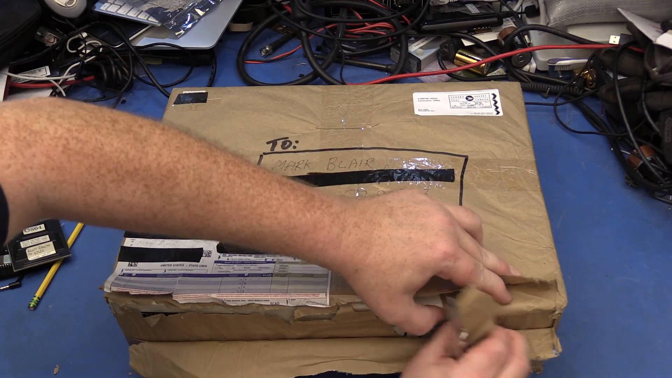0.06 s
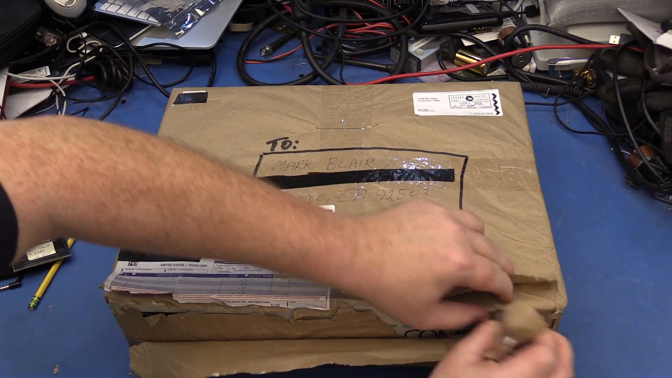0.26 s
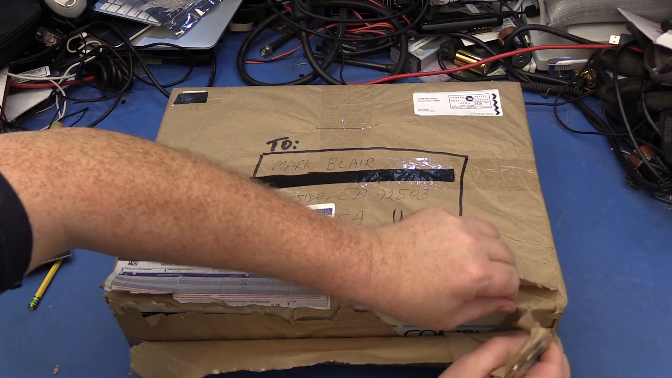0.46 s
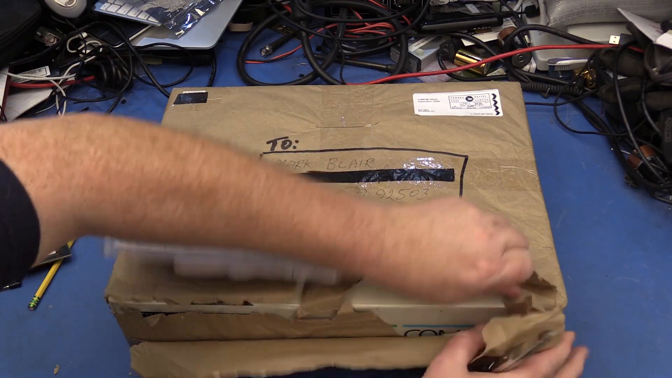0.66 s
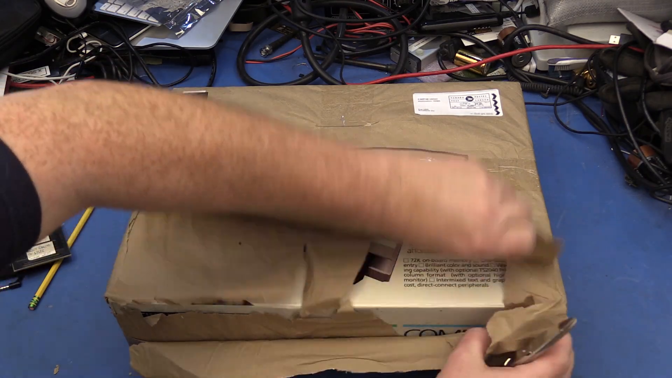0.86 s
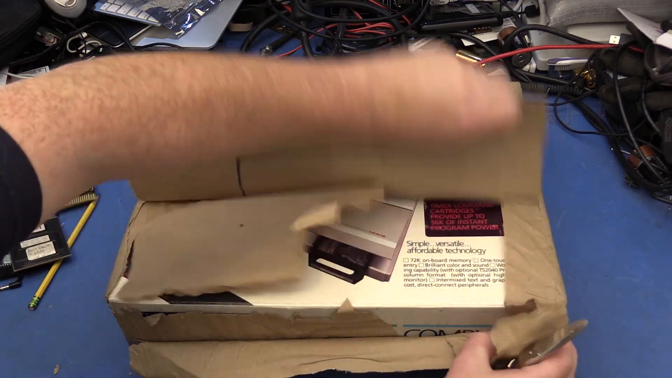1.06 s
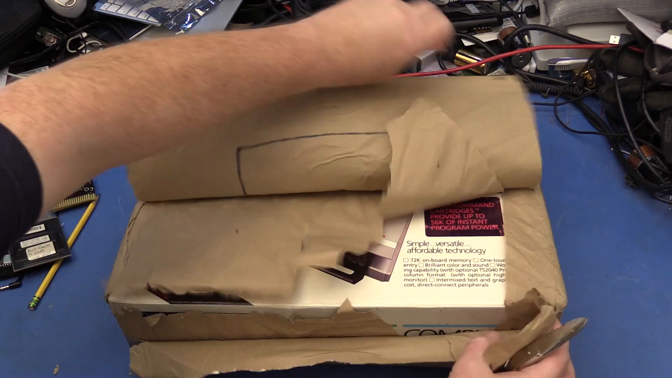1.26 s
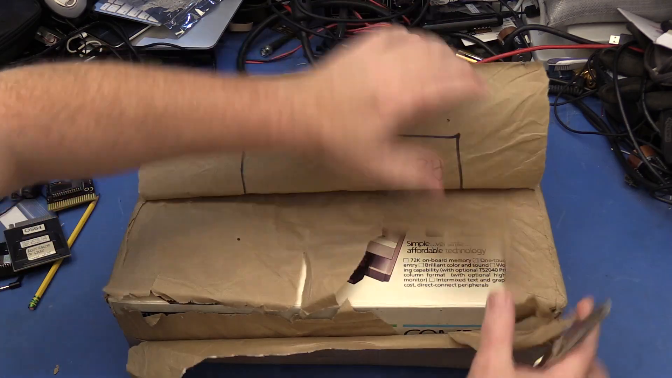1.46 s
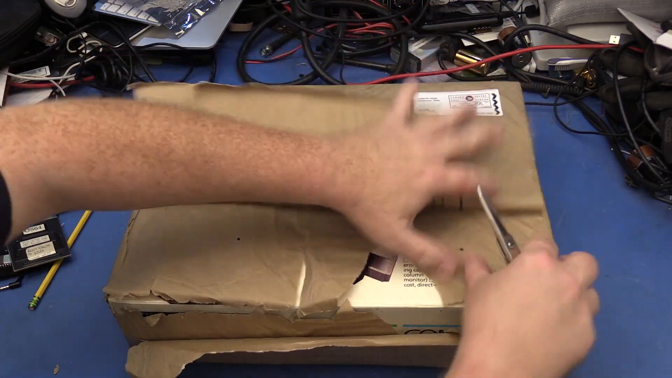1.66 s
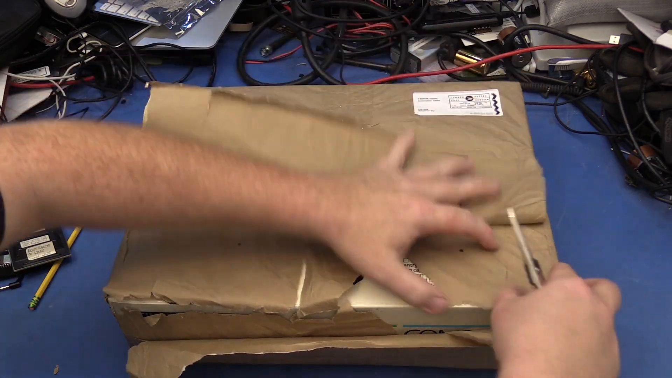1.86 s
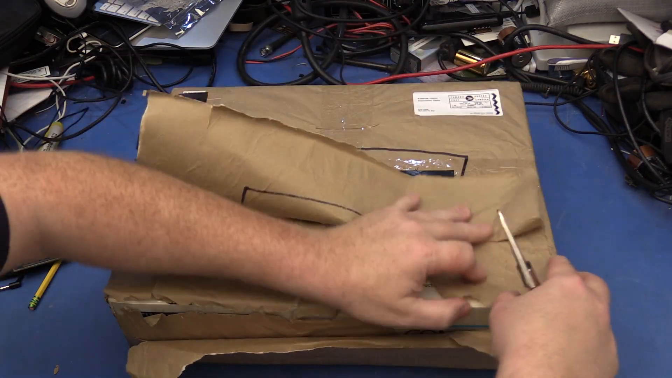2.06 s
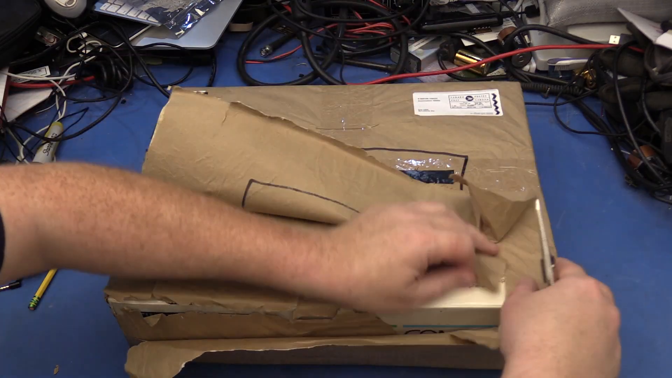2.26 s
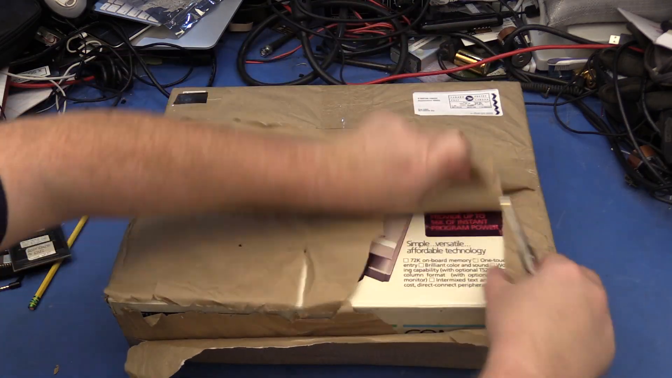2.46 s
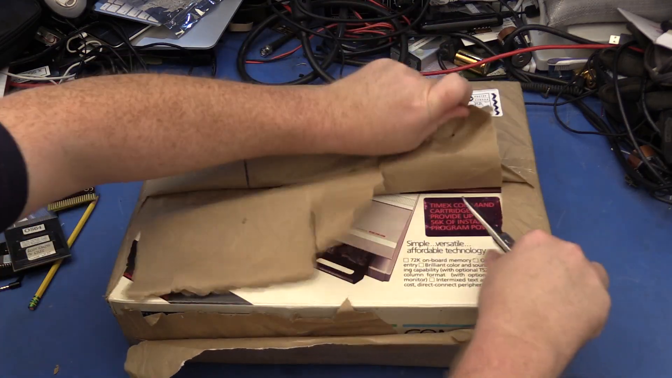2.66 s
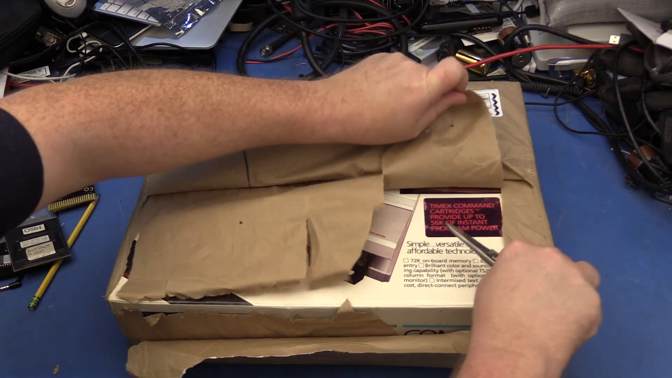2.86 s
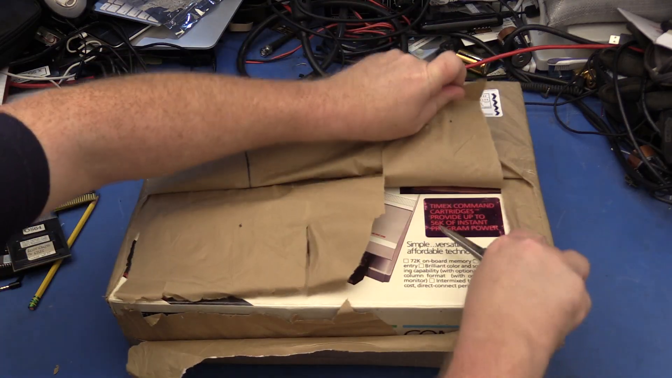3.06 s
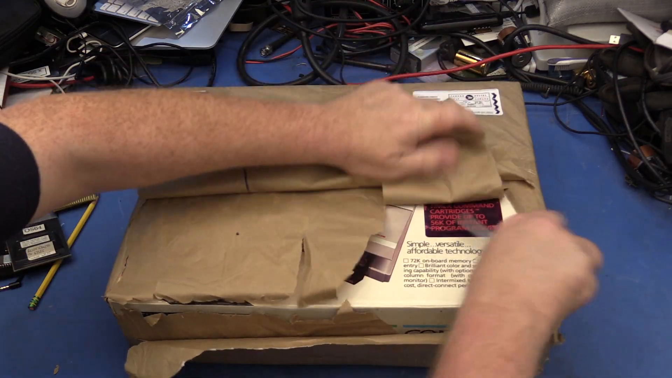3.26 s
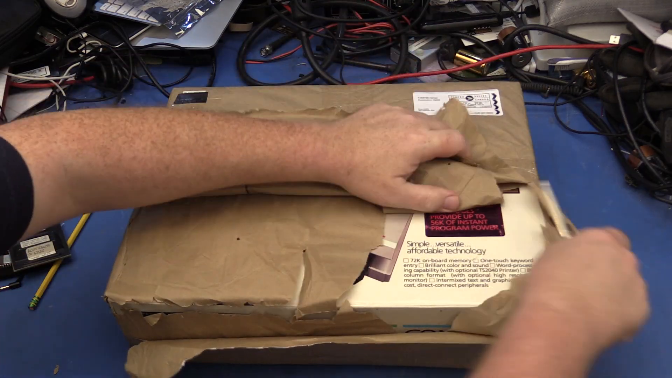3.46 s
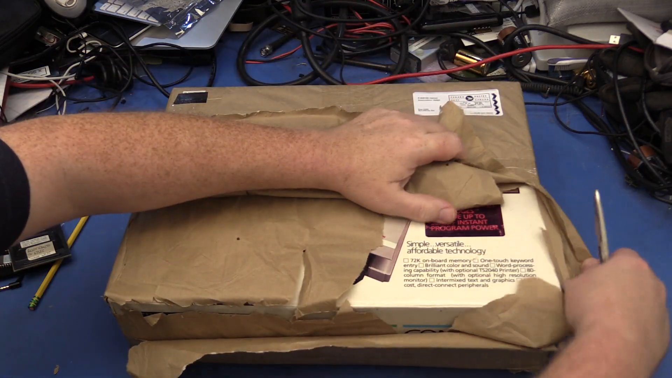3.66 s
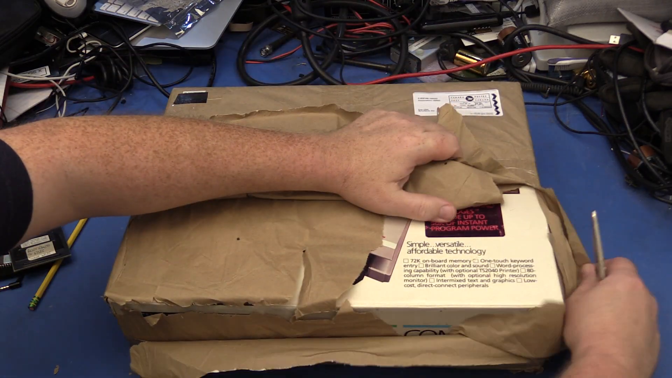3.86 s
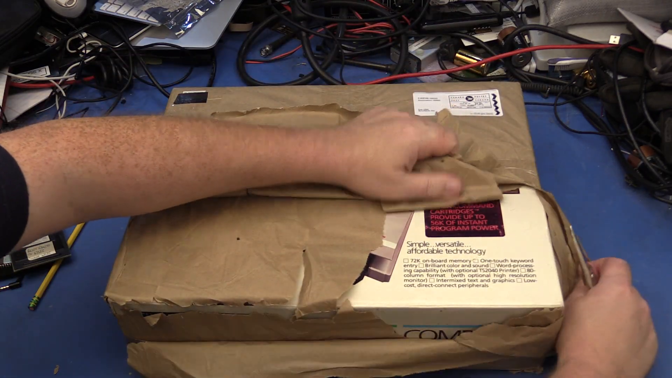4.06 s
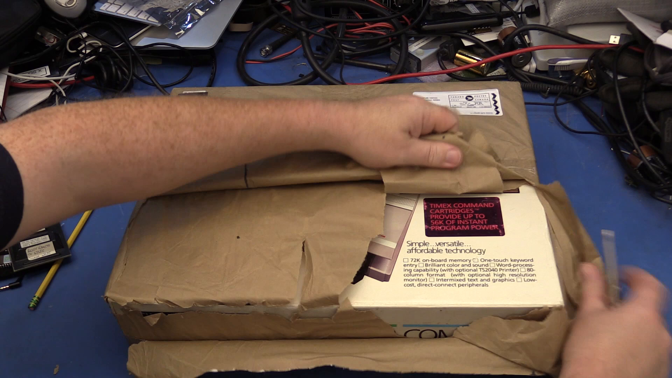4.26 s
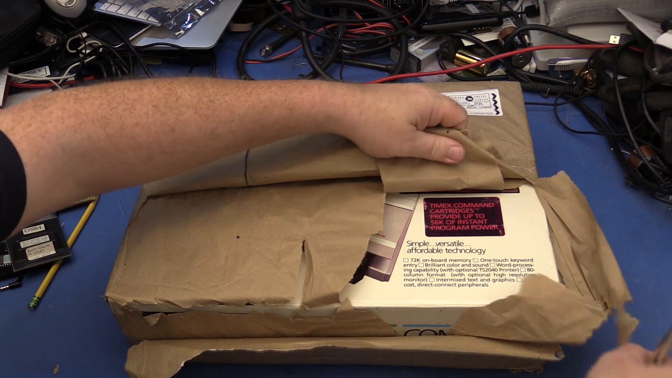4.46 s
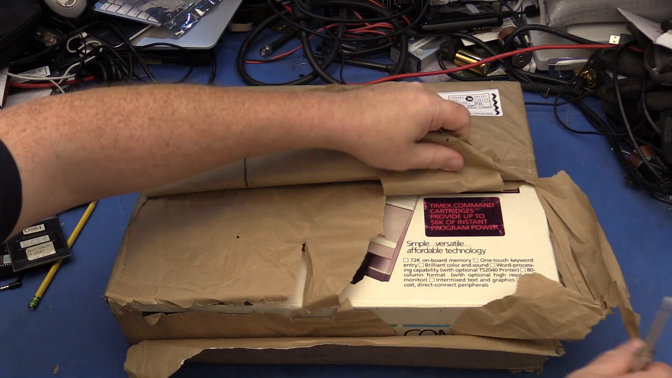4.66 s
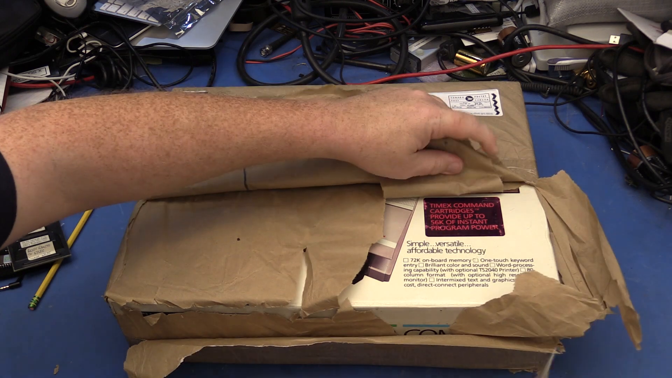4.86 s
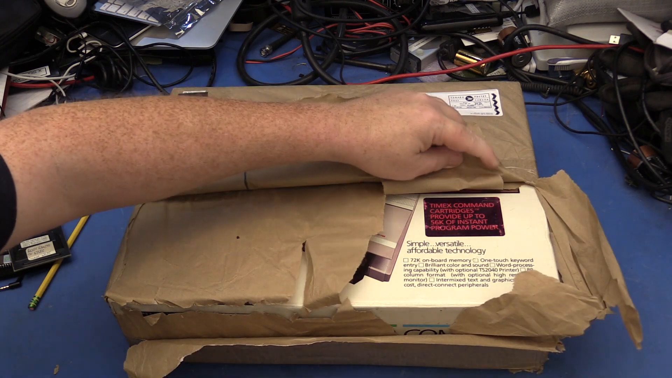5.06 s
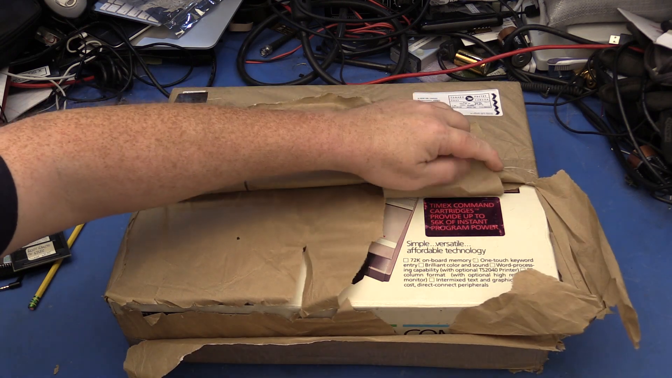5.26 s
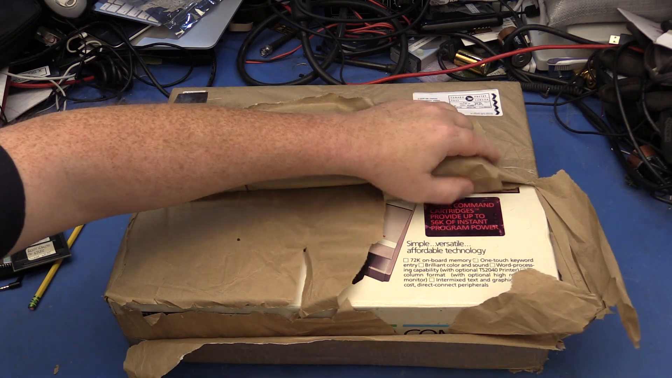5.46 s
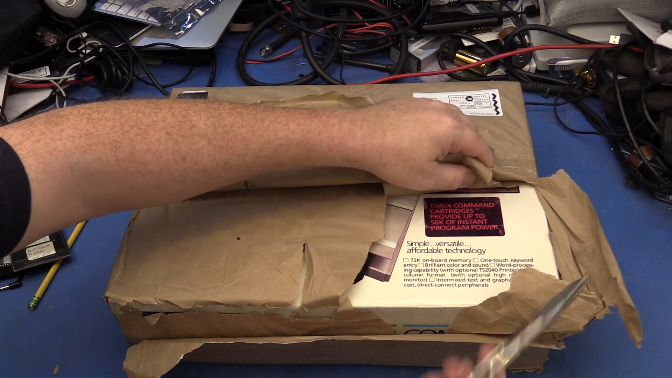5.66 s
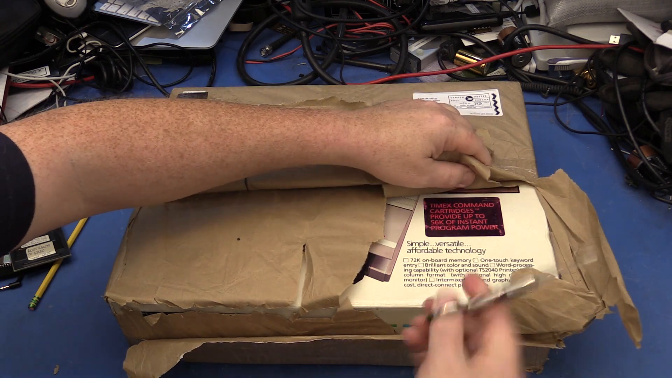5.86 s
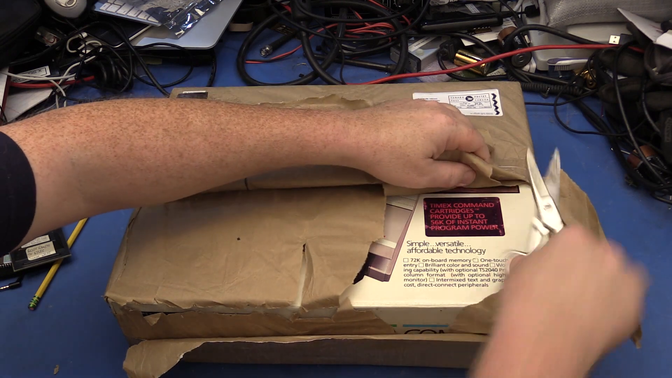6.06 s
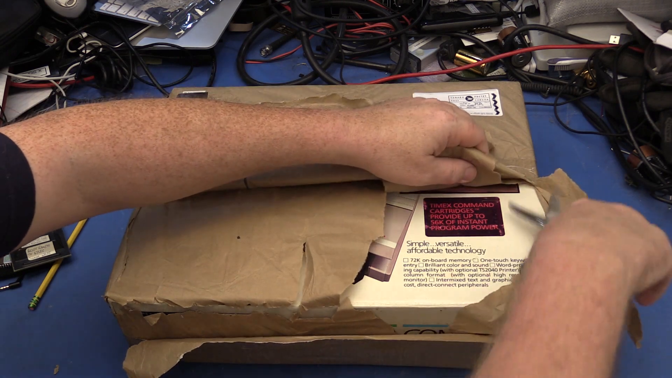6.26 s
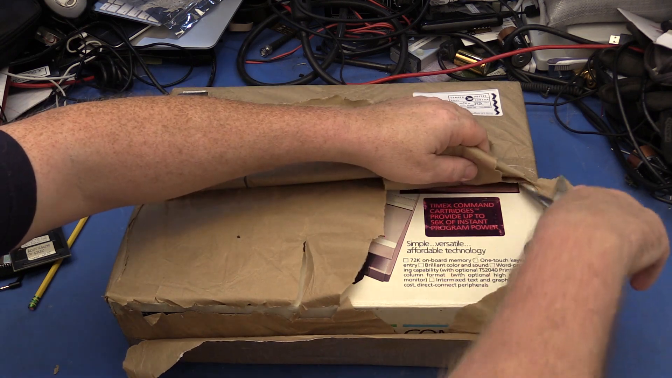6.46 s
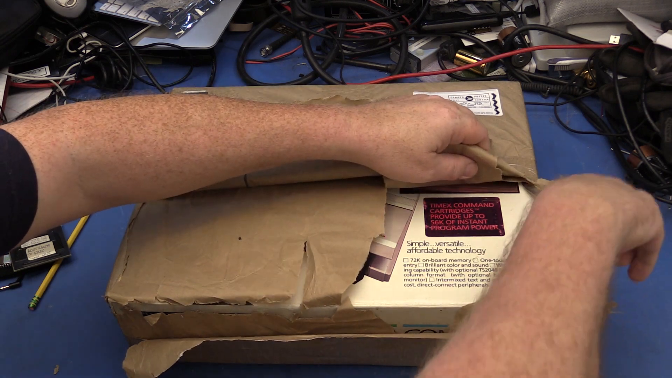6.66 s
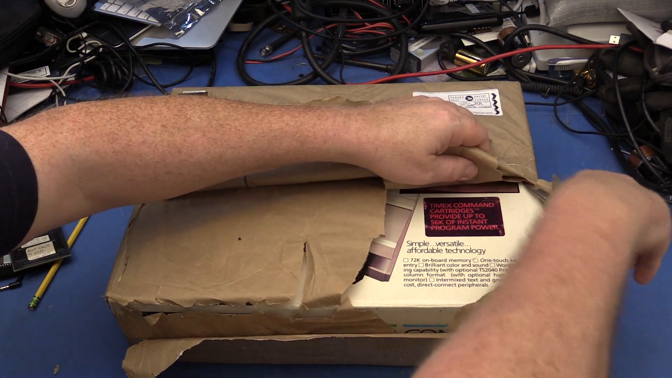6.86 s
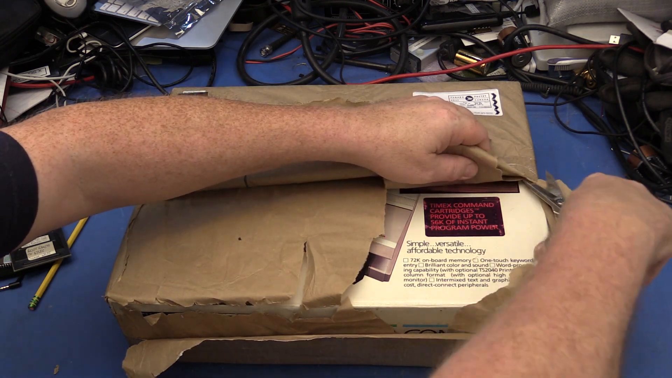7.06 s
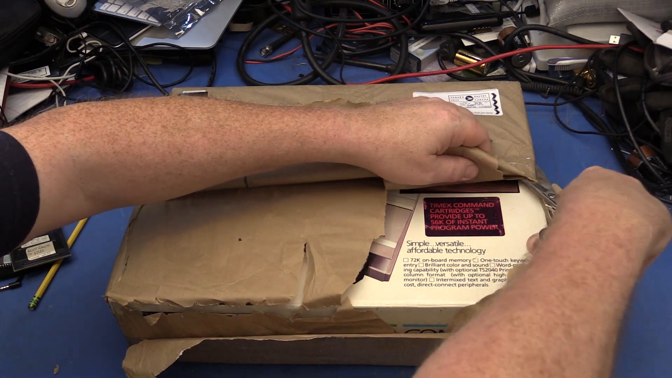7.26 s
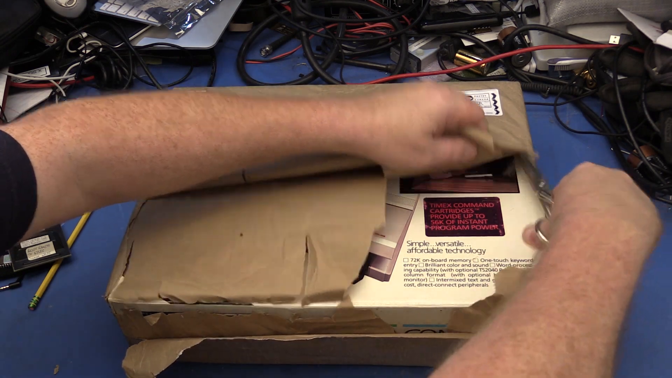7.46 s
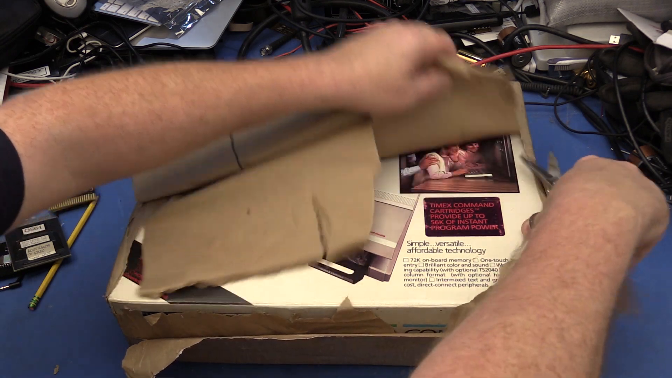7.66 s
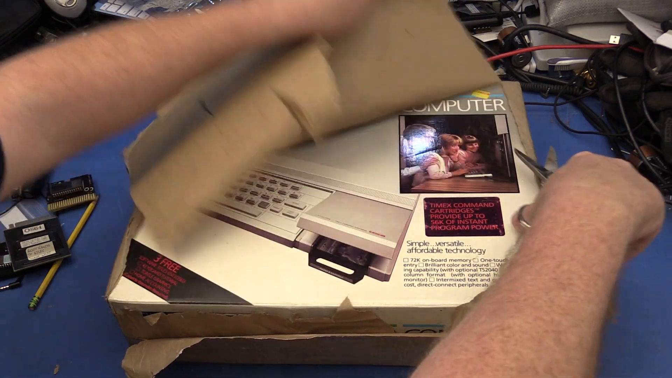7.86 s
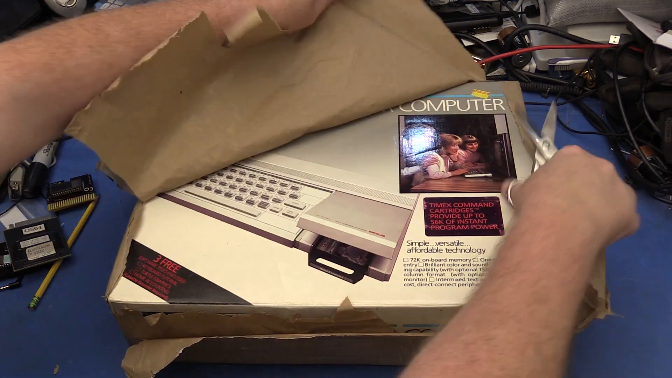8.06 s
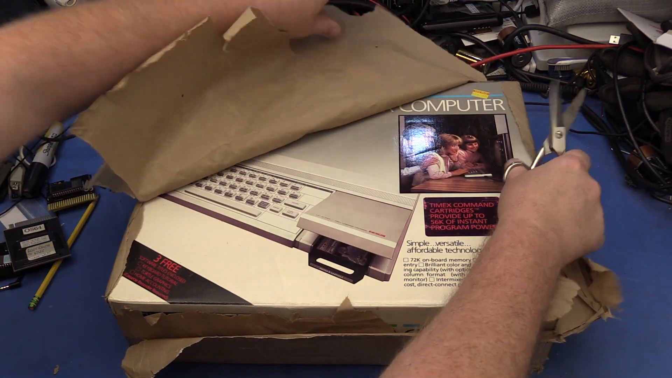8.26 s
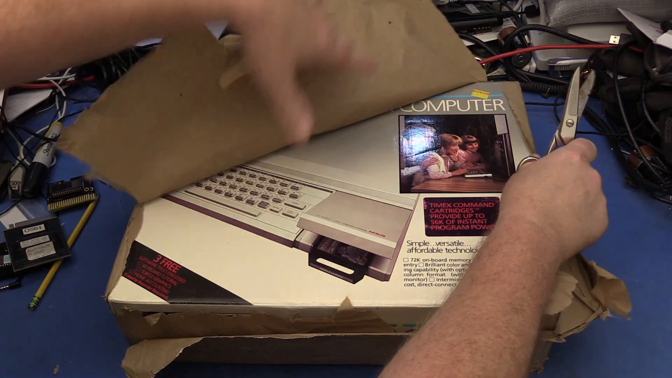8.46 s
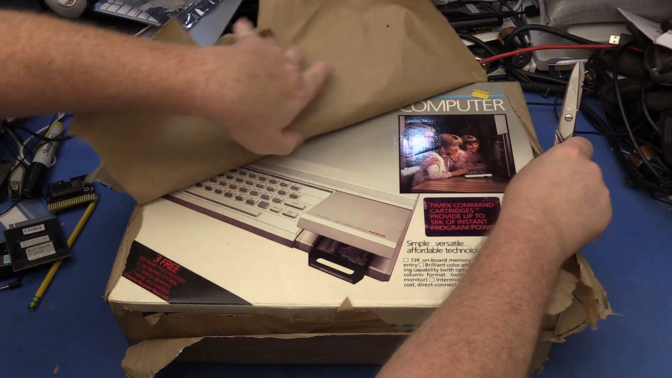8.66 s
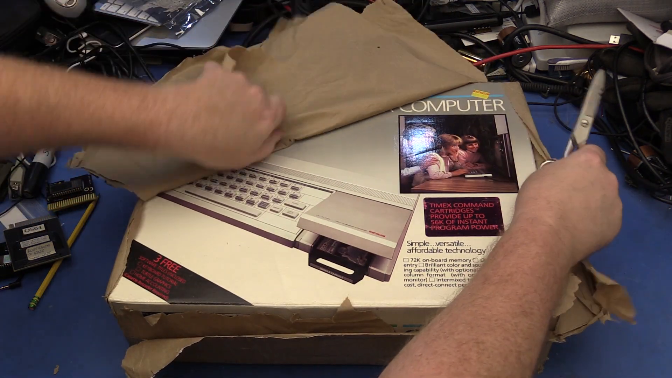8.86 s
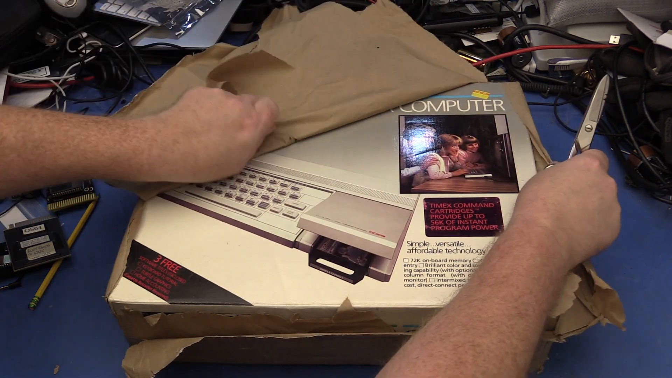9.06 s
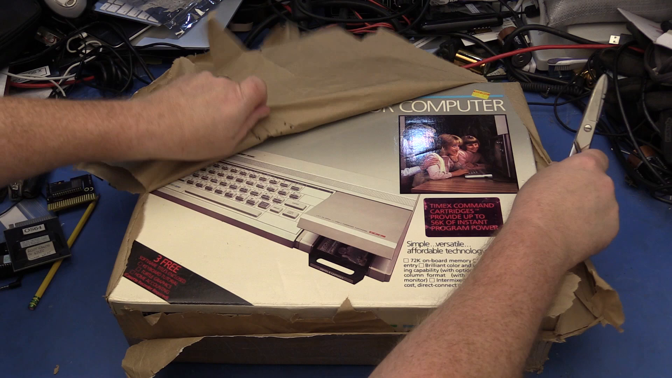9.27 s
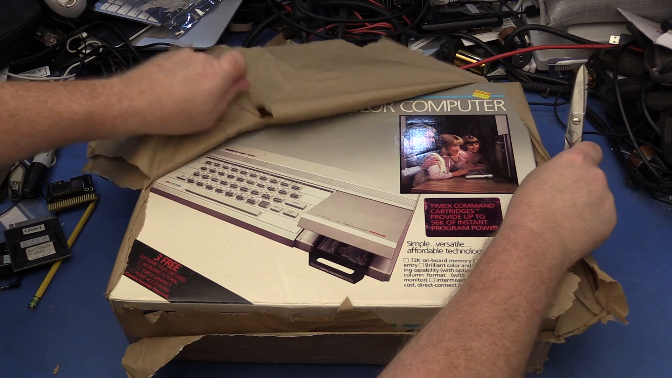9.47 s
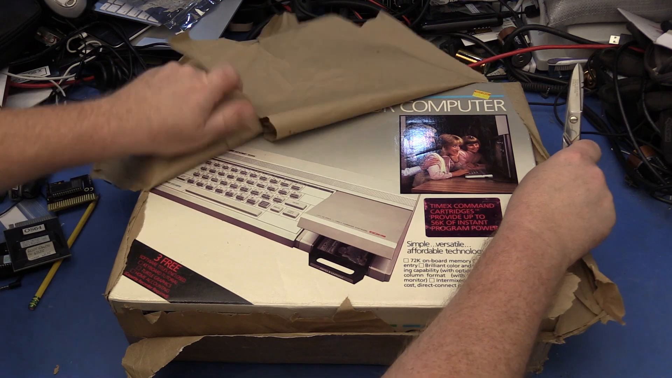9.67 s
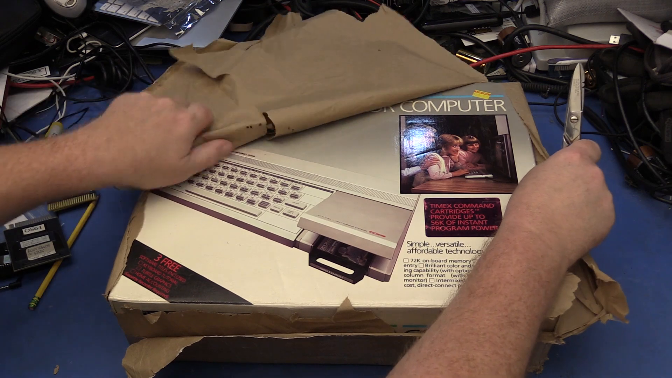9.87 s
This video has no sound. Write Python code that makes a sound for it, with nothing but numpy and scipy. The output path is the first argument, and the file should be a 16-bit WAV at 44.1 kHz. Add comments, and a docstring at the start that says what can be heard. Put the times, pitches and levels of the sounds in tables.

```python
"""Stiff brown paper snaps, crackles and hisses close by as two hands pull, crease, tear and cut it off a box.
Creases buckle as noise bursts with a ringing panel, over clumps of small crackles made of enveloped noise.
The sheet over the box answers low and the fibres high, each as noise through its own spectrum.
Low gusts from the moving sheet push at the microphone and dull bumps shake the cardboard box.
A small room adds decaying noise tails; a quiet, slowly wavering floor of noise lies behind."""
import sys
import numpy as np
from scipy import signal
from scipy.fft import rfft, irfft, next_fast_len
from scipy.io import wavfile
from scipy.ndimage import uniform_filter1d, map_coordinates

SR = 44100
rng = np.random.default_rng(int(sys.argv[2]) if len(sys.argv) > 2 else 0)


def master_out(mix):
    """Clip the mix to full scale and print it as 16-bit PCM to the path in sys.argv[1]."""
    frames = np.transpose(np.atleast_2d(mix))
    ceiling = np.clip(frames, -1, 1)
    pcm = np.round(ceiling * 32767).astype(np.int16)
    wavfile.write(sys.argv[1], SR, pcm)


N = 437472


def amp(db):
    """Decibel law: a level in dB becomes an amplitude ratio."""
    return 10 ** (np.asarray(db) / 20)


def unit(x):
    """Power normalisation: x scaled to rms 1."""
    return x / np.sqrt(np.mean(x ** 2) + 1e-20)


def along(points, hz):
    """Logarithmic frequency scale: (Hz, value) points joined by straight lines over log frequency."""
    point_hz, values = np.transpose(points)
    return np.interp(np.log(hz + 1), np.log(point_hz + 1), values)


def curves(rows):
    """Slow modulation: one value per sample for each column after the time."""
    s, *columns = np.transpose(rows)
    return [np.interp(np.arange(N) / SR, s, column) for column in columns]


def wobble(rate):
    """Band-limited random modulation: a smooth curve through `rate` random knots a second."""
    knots = rng.standard_normal(int(N * rate / SR) + 4)
    return map_coordinates(knots, [np.arange(N) * rate / SR])


def colour(x, spectrum):
    """Minimum-phase filtering: x takes on this spectrum causally, with power gain 1."""
    m = next_fast_len(N + SR // 4)
    gain = amp(along(spectrum, np.fft.rfftfreq(m, 1 / SR))) + 1e-4
    cepstrum = irfft(np.log(unit(gain)), m)
    # folding the cepstrum onto positive time makes the filter causal
    cepstrum[1:m // 2] *= 2
    cepstrum[m // 2 + 1:] = 0
    return irfft(rfft(x, m) * np.exp(rfft(cepstrum)), m)[:N]


def patchy(depth_db):
    """Random spectral modulation: noise whose colour differs from one small fold to the next."""
    noise = signal.stft(rng.standard_normal(N), nperseg=128)[2]
    field = uniform_filter1d(rng.standard_normal(noise.shape), size=5, axis=0)
    field = uniform_filter1d(field, size=4, axis=1)
    return unit(signal.istft(noise * amp(depth_db * unit(field)), nperseg=128)[1][:N])


# How hard the hands work the sheet. Each row: time in seconds, crackle level in dB.
EFFORT = [(0, -45.5), (.17, -35), (.24, -31.5), (.37, -38), (.54, -50.5), (.74, -37), (.85, -40),
          (.96, -26.5), (1.18, -26.5), (1.28, -39), (1.33, -33), (1.37, -44.5), (1.61, -58), (1.74, -40),
          (1.89, -50.5), (2.0, -39.5), (2.38, -44), (2.43, -35.5), (2.6, -26), (2.64, -24), (2.71, -42),
          (2.98, -38), (3.13, -41), (3.21, -35), (3.39, -29), (3.56, -40.5), (3.89, -40.5), (4.01, -34),
          (4.31, -39), (4.48, -37.5), (4.65, -54), (4.71, -45.5), (5.02, -58.5), (5.07, -46.5), (5.22, -58),
          (5.32, -47), (5.52, -47.5), (5.62, -37.5), (5.81, -65), (6.02, -69.5), (6.22, -49), (6.4, -57),
          (6.6, -52), (6.74, -60.5), (7.1, -64.5), (7.27, -47), (7.4, -55.5), (7.43, -31.5), (7.57, -29.5),
          (7.9, -21.5), (8.02, -24), (8.09, -37.5), (8.23, -42), (8.29, -35), (8.37, -45), (8.52, -46.5),
          (8.59, -33), (8.68, -42.5), (8.75, -44.5), (8.83, -33.5), (9.09, -41), (9.22, -33.5),
          (9.4, -39.5), (9.49, -29), (9.55, -24.5), (9.67, -41.5), (9.79, -32.5), (9.86, -49.5),
          (9.92, -43.5)]
# The rustle left by a 1 ms snap, re the snap's crackle setting, and how fast it dies
SETTLE_DB, SETTLE_DB_PER_S = -24, 188


def effort_db():
    """Power addition: the pull of the hands plus the decaying rustle of the sheet settling after every snap."""
    s, db, _, _, ms = np.transpose(CREASE_SNAPS)
    kicks = np.bincount(np.round(s * SR).astype(int), amp(2 * (db + SETTLE_DB)) * ms, N)
    settling = signal.lfilter([1], [1, -amp(-2 * SETTLE_DB_PER_S / SR)], kicks)
    pull = amp(2 * curves(EFFORT)[0])
    return 10 * np.log10(pull + settling)


def crackles(busy, spread_db, own_db, life_ms, slide):
    """Shot noise: three trains of bursts share their times, `busy` a second, over the even hiss of sliding."""
    at = np.nonzero(rng.random(N) < busy / SR)[0]
    shared_db = spread_db * np.minimum(rng.exponential(size=len(at)), 3.5)
    trains = []
    for life in life_ms:
        starts = np.zeros(N)
        starts[at] = amp(2 * (shared_db + own_db * rng.standard_normal(len(at))))
        # burst amplitude falls by a factor e in one life
        power = np.abs(signal.lfilter([1], [1, -np.exp(-2000 / (life * SR))], starts))
        # the hand sets the slow level, the bursts share it out
        power /= uniform_filter1d(power, SR // 8) + 1e-9
        envelope = np.sqrt(slide + (1 - slide) * power)
        trains.append(envelope * patchy(depth_db=2.5))
    return trains


# Spectrum of the sheet over the box. Each row: frequency in Hz, relative level in dB per Hz.
BODY_SPECTRUM = [(59, -31.5), (100, -12), (253, -5), (313, -5), (462, -3.5), (816, 0.5), (1400, -1.5),
                 (2010, -3.5), (3600, -15.5), (4680, -17.5), (7920, -120)]
# Spectrum of the crackles. Each row: frequency in Hz, relative level in dB per Hz.
CRACKLE_SPECTRUM = [(1800, -18), (2800, -9), (3600, -8.5), (4700, 0), (5800, -0.5), (6900, -2.5),
                    (8200, -18.5), (10000, -23)]
# Spectrum of the fibre hiss. Each row: frequency in Hz, relative level in dB per Hz.
FIBRE_SPECTRUM = [(5000, -46), (7000, -7), (8200, -2.5), (10000, -2.5), (12000, -4.5), (13200, -7),
                  (15200, -8.5), (16500, -40)]


def paper(low, mid, high):
    """Superposition: sheet body, crackle and fibres each radiate in their own band."""
    return colour(low, BODY_SPECTRUM) + colour(mid, CRACKLE_SPECTRUM) + colour(high, FIBRE_SPECTRUM)


# Slow colour of the paper. Each row: time in seconds, sheet body re crackle in dB, fibre hiss re crackle
# in dB, then the level in dB of the regions near 2 kHz, near 3 kHz and near 9 kHz.
PAPER_COLOUR = [(0, 5, 3.5, -4, -0.5, 5), (.25, 3, 7, 0.5, 8.5, 1.5), (.55, 7, 3.5, -7.5, 4, 2),
                (.9, 10, 5, -6.5, -1.5, 1), (1.3, 7.5, -1, -5.5, 1, 1.5), (1.6, 9.5, -5, -3, 0, 3),
                (1.8, 12.5, 2.5, -6, -1, 2.5), (2.4, 2.5, 3, 0.5, 5.5, -1.5),
                (2.6, 10, 4.5, -1.5, -0.5, 0.5), (2.85, 7, 3, 1.5, 0, -0.5), (3.4, 5, 2, 0.5, 1, 3),
                (3.85, 4.5, 4.5, 0, 3, 0), (4.3, 4, -2, 2, -0.5, 1.5), (5.4, 3, -4, 4.5, 3, 3),
                (6.3, 8, -3.5, 0, -0.5, -.5), (7.35, 4, -0.5, 1, 0, 1), (7.601, 5.5, 2.5, -2, -6, -3),
                (7.95, 3.5, -0.5, -.5, -1.5, 0.5), (8.6, 4.5, -1.5, 1, -0.5, 1.5), (9.45, 5, 1, 0, 5, 2),
                (9.92, 10, 2.5, -5, 5, 0)]
BODY_SHIFT = -0.14  # dB of body gained per dB of effort: light handling is duller


def rustle():
    """Stick-slip friction: harder pulls crackle louder, denser and more evenly; light ones clump as folds yield."""
    db = effort_db()
    body_db, fibre_db, *_ = curves(PAPER_COLOUR)
    body_db = body_db + BODY_SHIFT * (db + 38)
    clumps_db = np.clip(-.15 * (db + 14.5), 0, 8) * wobble(50)
    busy = 400 * amp(.5 * (db + 34.5) + clumps_db)  # crackles a second
    slide = np.clip(0.45 + 0.0055 * (db + 39), 0, .9)  # share of power in even hiss
    low, mid, high = crackles(busy, spread_db=1.0, own_db=5.5, life_ms=[2, .7, .5], slide=slide)
    return paper(amp(db + body_db) * low, amp(db) * mid, amp(db + fibre_db) * high)


def tinted(x):
    """Spectral envelope: three broad regions of the paper's colour rise and sink slowly."""
    hz, spectrum = np.fft.rfftfreq(N, 1 / SR) + 1, rfft(x)
    for db, centre_hz, octaves in zip(curves(PAPER_COLOUR)[2:], [2000, 3000, 8800], [.25, .27, .18]):
        bell = np.exp(-.5 * (np.log2(hz / centre_hz) / octaves) ** 2)
        x = x + (amp(db) - 1) * irfft(spectrum * bell, N)
    return x


# Air fanned by the sheet. Each row: time in seconds, gust level setting in dB.
AIR_GUSTS = [(0.0, -52), (0.63, -51), (1.13, -43.5), (1.44, -54), (2.37, -53.5), (2.79, -42.5), (5.08, -59),
             (6.44, -54), (7.15, -56), (7.6, -49.5), (9.75, -49), (9.92, -50)]
# Spectrum of that air at the microphone. Each row: frequency in Hz, relative level in dB per Hz.
AIR_SPECTRUM = [(8.8, -24), (15, 8), (37, 6), (87, -5.5), (160, -11), (210, -45), (350, -120)]


def air():
    """Low-frequency pressure: the sheet fans gusts at the microphone, each quick tug adding to them."""
    effort = effort_db()
    tug_db = uniform_filter1d(effort, SR // 20) - uniform_filter1d(effort, SR)
    gust_db = curves(AIR_GUSTS)[0] + 5.0 + 0.32 * tug_db + 2.0 * wobble(15)
    return amp(gust_db) * colour(rng.standard_normal(N), AIR_SPECTRUM)


# Spectrum of the quiet background. Each row: frequency in Hz, relative level in dB per Hz.
FLOOR_SPECTRUM = [(35, -24), (60, -3), (168, -4.5), (593, 6), (1280, 1), (3040, -15), (7940, -16),
                  (9790, -11), (16000, -21)]
FLOOR_DB = -51.5


def background():
    """Stationary coloured noise: a quiet floor whose level wavers slightly."""
    return amp(FLOOR_DB + 1.4 * wobble(6)) * colour(rng.standard_normal(N), FLOOR_SPECTRUM)


# Buckling creases and short rips. Each row: centre in seconds, crackle level setting in dB, sheet body
# re crackle setting in dB, body pitch in Hz, length in ms.
CREASE_SNAPS = [(0.1162, -36, 2.5, 1460, 3.6), (0.4551, -39, 7, 650, 3), (0.564, -39, 13.5, 1070, 3.5),
                (0.6514, -37.5, 12.5, 1150, 4.1), (.6742, -29, 3.5, 590, 5.2),
                (0.7776, -29.5, 7, 940, 3.35), (1.14, -26, 9, 790, 3.6), (1.2017, -18, 2.5, 970, 3.5),
                (1.3052, -29, 11, 1100, 10), (1.3994, -39.5, 12.5, 810, 4.1), (1.444, -38, -7, 720, 4.1),
                (1.517, -35.5, -9, 1200, 2.1), (1.663, -46, 21, 620, 5.7), (1.72, -30, 9, 1010, 2.7),
                (1.7329, -32.5, 14, 1370, 4.5), (1.8138, -40, 17.5, 860, 5.5),
                (1.8873, -37.5, 10, 820, 2.8), (1.9584, -36.5, 8, 825, 5.5), (2.1043, -28.5, -3, 450, 2.9),
                (2.252, -36.5, 14.5, 1380, 2.6), (2.421, -37, 9, 950, 9.6), (2.4398, -29, -7, 900, 10),
                (2.517, -27.5, 10.5, 2100, 2.9), (2.5404, -26, 14, 1200, 1.6), (2.574, -23, 5.5, 1070, 2.5),
                (2.6708, -22, 2, 615, 2.9), (2.7415, -38, 15, 1090, 2), (2.755, -23.5, 4, 343, 7),
                (2.8183, -27, 6, 897, 9.4), (2.853, -23, 1, 794, 4.5), (2.8978, -23.5, 1.5, 2160, 7),
                (2.9453, -27, -6, 760, 2.5), (2.9594, -17, 3, 1380, 1.9), (2.99, -31, 9, 860, 8.4),
                (3.0079, -27, 12.5, 826, 2.55), (3.022, -24.5, 10.5, 1860, 2.1),
                (3.0386, -25.5, 10.5, 1180, 1.76), (3.084, -33, 10.5, 750, 8.4),
                (3.1517, -28, 2, 2070, 5.1), (3.2003, -35.5, 18, 630, 5.4), (3.222, -24.5, 4, 1330, 6.9),
                (3.2593, -27, 11, 1860, 2.2), (3.289, -22.5, -13, 1360, 2.1), (3.363, -24.5, -12, 1300, 11),
                (3.65, -24.5, -11.5, 1410, 1.1), (3.6796, -27, 2, 353, 1.45),
                (4.018, -19.5, -11, 640, 1.06), (4.0653, -27, 2.5, 1580, 3.8),
                (4.1352, -18.5, -5, 1070, 1.9), (4.179, -27.5, 0.5, 1593, 5.2),
                (4.231, -26.5, -1, 1086, 2.7), (4.3096, -27, 2, 1920, 5.7), (4.4166, -20, 3.5, 1723, 1.2),
                (4.4537, -25, -5, 2200, 3.1), (4.5344, -43, 19, 1680, 2.6), (4.6855, -35, 4.5, 810, 4.4),
                (4.739, -39.5, 9.5, 510, 9), (4.7768, -40.5, 14, 1410, 2.8), (4.7982, -38, 8, 1390, 2.5),
                (4.8212, -38, 11, 693, 1.7), (5.08, -36, 6.5, 2520, 3.2), (5.299, -48, 15.5, 1410, 3),
                (5.3284, -37.5, 2.5, 880, 2.7), (5.42, -31.5, -3.5, 1374, 4.7),
                (5.456, -35, 2.5, 1790, 3.3), (5.505, -36, 4, 1500, 5.2), (5.538, -28, 3, 750, 2.45),
                (5.5497, -31, 0, 1440, 4.9), (5.6009, -29.5, 7.5, 1425, 3.6),
                (5.6124, -21, -8.5, 1467, 2.5), (5.625, -22, -11, 977, 2.1), (5.6876, -37, 9, 580, 6.2),
                (5.867, -57, 14.5, 1210, 2.9), (5.9362, -37, 12, 1174, 4.6), (5.946, -32.5, -6, 718, 1.8),
                (5.971, -39, -1, 1295, 2), (6.048, -40, -9, 360, 2), (6.1002, -35.5, 12, 1480, 2.5),
                (6.158, -32, 2, 1440, 2.1), (6.17, -31.5, 3, 1208, 2.4), (6.2009, -53, 22, 614, 4.8),
                (6.2111, -35, 11.5, 2220, 2), (6.2274, -41, 12, 1850, 3.4), (6.254, -37.5, 10.5, 2264, 2.3),
                (6.3122, -40, 6.5, 1030, 5.2), (6.3398, -40, 3, 820, 4), (6.396, -36.5, 11.5, 1873, 2.2),
                (6.434, -39, 5, 777, 2), (6.4522, -18, -1.5, 639, 2.2), (6.5565, -35.5, 8, 1457, 3.4),
                (6.569, -36.5, 11, 1276, 1.9), (6.592, -31.5, 3.5, 750, 2.9), (6.6384, -34, 9, 840, 3.5),
                (6.688, -42.5, 1, 1550, 5.3), (6.814, -43.5, 16.5, 1014, 1.9), (6.921, -28, -5, 1524, 1.55),
                (7.019, -43, 11, 1352, 4.9), (7.032, -42.5, 10, 521, 10.3), (7.175, -56, 18.5, 794, 4.4),
                (7.248, -43.5, 5.5, 590, 11), (7.2855, -28, 4, 710, 6.9), (7.4196, -28, -6.5, 927, 1.2),
                (7.4447, -20.5, -8.5, 447, 1.75), (7.636, -24.5, 3, 1290, 2.23),
                (7.655, -19.5, 4, 1590, 2.7), (8.123, -24, 2, 570, 5.3), (8.1621, -21, 2.5, 1780, 3.2),
                (8.2667, -29, -12, 1660, 2.17), (8.452, -37, -7.5, 470, 5.9), (8.567, -26, -8, 970, 5),
                (8.5768, -30.5, 5, 1920, 14.3), (8.6261, -24.5, -4, 546, 4.1),
                (8.7963, -25.5, -10.5, 936, 3.6), (8.818, -27, 5.5, 578, 3.8),
                (8.8417, -25.5, -20, 732, 2.7), (9.0148, -31.5, -4.5, 1512, 4.1),
                (9.2067, -27.5, 9, 2366, 3.2), (9.2342, -30, 1, 547, 6.8), (9.3009, -26, 1, 2100, 2.1),
                (9.415, -26, 8, 2550, 1.53), (9.4779, -19.5, 7.5, 400, 6.9), (9.7726, -28.5, 3, 586.4, 7.5),
                (9.787, -40, 9, 930, 5.4), (9.9142, -40.5, 2, 655, 7.6)]
# A snap's hiss follows the paper's colour, more steeply: offset in dB, dB per dB
SNAP_FIBRE_DB, SNAP_FIBRE_GROWS = -1, 1.2


def snaps():
    """Snap-through buckling: a crease yields in a swelling, dying burst and the panel beside it rings briefly."""
    low, mid, high = np.zeros((3, N + SR))
    t = np.arange(SR // 20) / SR
    hiss_db = SNAP_FIBRE_DB + SNAP_FIBRE_GROWS * curves(PAPER_COLOUR)[1]
    for s, db, body_db, hz, ms in CREASE_SNAPS:
        fibre_db = hiss_db[round(s * SR)]
        life = max(ms, .4) / 1000
        start = max(round((s - life / 2) * SR), 0)
        u = t / (0.36 * life)  # time in units of the rise to the peak
        shape = (u * np.exp(1 - u)) ** 0.84
        bursts = shape * rng.standard_normal((3, len(t)))
        # every burst carries the energy of its envelope
        energy = np.sum(bursts ** 2, axis=1, keepdims=True)
        body, crackle, fibre = bursts / np.sqrt(energy / np.sum(shape ** 2))
        decay = amp(-60 * t / (4 / hz + 2.1 * life))
        panel = np.sin(2 * np.pi * hz * t) * (1 - np.exp(-u)) * decay
        low[start:][:len(t)] += amp(db + body_db) * (1.155 * body + 1.47 * panel)
        mid[start:][:len(t)] += amp(db + 3.0) * crackle
        high[start:][:len(t)] += amp(db + fibre_db + 2.5) * fibre
    return paper(low[:N], mid[:N], high[:N])


# Hands and scissors bumping the box. Each row: time in seconds, level setting in dB.
BOX_BUMPS = [(2.66, -26), (3.68, -29), (5.689, -43), (5.936, -46.5), (6.453, -24), (7.427, -37.5),
             (8.161, -29.5), (8.57, -30), (9.474, -25.5)]


def bumps():
    """Damped resonance: the box wall dips under the blow, springs out and swings at 42 Hz as it dies away."""
    out, t = np.zeros(N + SR), np.arange(SR // 5) / SR
    dip = -1.3 * np.sin(np.pi * np.clip(t / 0.0012, 0, 1)) ** 2
    decay = amp(-60 * t / 0.088)
    spring = decay * np.cos(2 * np.pi * 42 * t) * np.clip(t / 0.0011 - .7, 0, 1)
    for s, db in BOX_BUMPS:
        start = round((s - .0012) * SR)
        out[start:][:len(t)] += amp(db + 6.5) * (dip + spring)
    return out[:N]


# Reverberation of the small room. Each row: frequency in Hz, time to fall 60 dB in seconds.
ROOM_DECAY = [(200, 0.15), (1500, 0.16), (14000, 0.056)]


def room(x):
    """Reverberant decay: each frequency dies at its own speed, with a new tail every third of a second."""
    out, step = np.zeros(N + SR), SR // 3
    for k in range(0, N, step):
        hz, t, noise = signal.stft(rng.standard_normal(SR // 3), SR, nperseg=256)
        decay = amp(-60 * t / along(ROOM_DECAY, hz)[:, None])
        tail = signal.istft(noise * decay, SR, nperseg=256)[1]
        wet = signal.fftconvolve(x[k:k + step], tail / np.linalg.norm(tail))
        out[k + 120:][:len(wet)] += wet  # the tail starts 120 samples late
    return out[:N]


def scene():
    """Linear superposition: paper and box in the room, air on the microphone, the floor."""
    near = tinted(rustle() + snaps()) + bumps()
    return (near + amp(-13.5) * room(near) + air() + background())[None]


TOP_HZ = 16000


def record(dry):
    """Saturation and band limiting: peaks round off near full scale; nothing is kept from TOP_HZ up."""
    x = dry / (1 + np.abs(dry / .95) ** 4) ** (1 / 4)
    return irfft(rfft(x) * (np.fft.rfftfreq(N, 1 / SR) < TOP_HZ), N)


dry = scene()
out = record(dry)
master_out(out)
```